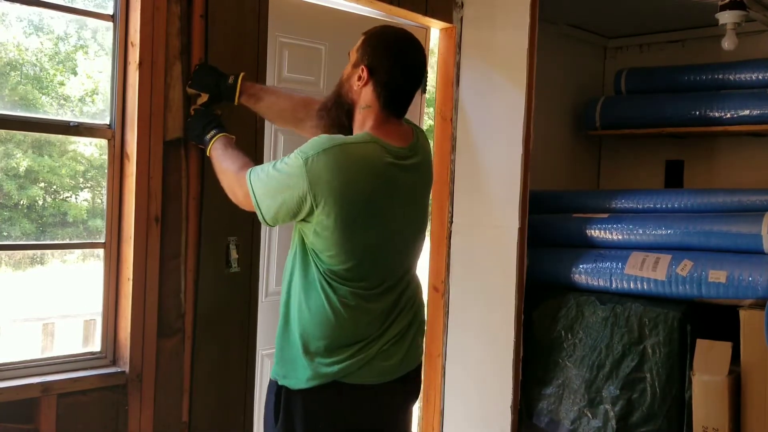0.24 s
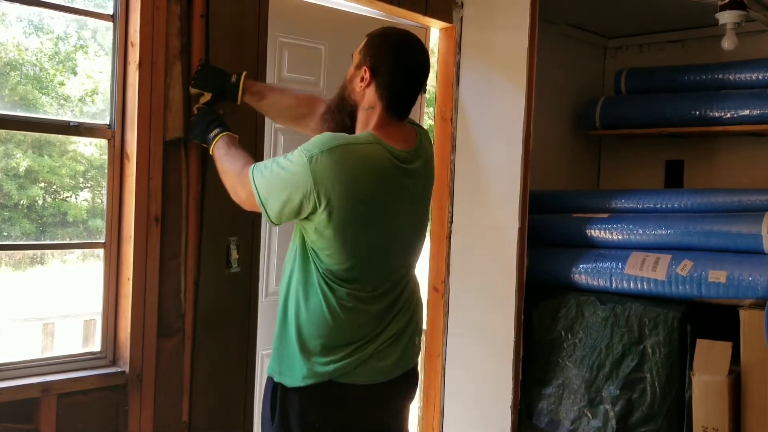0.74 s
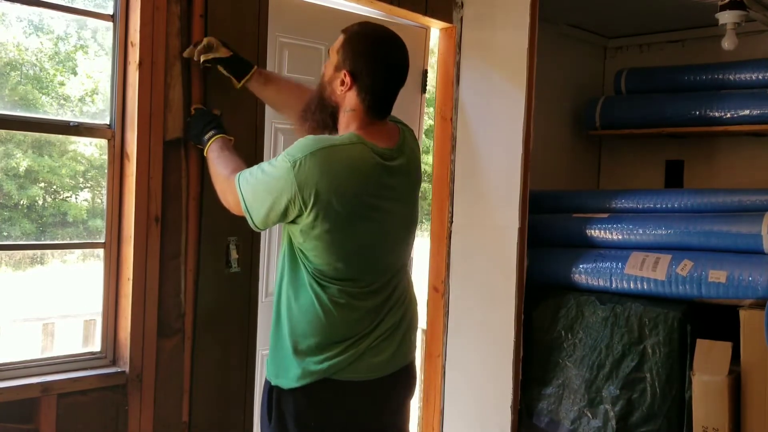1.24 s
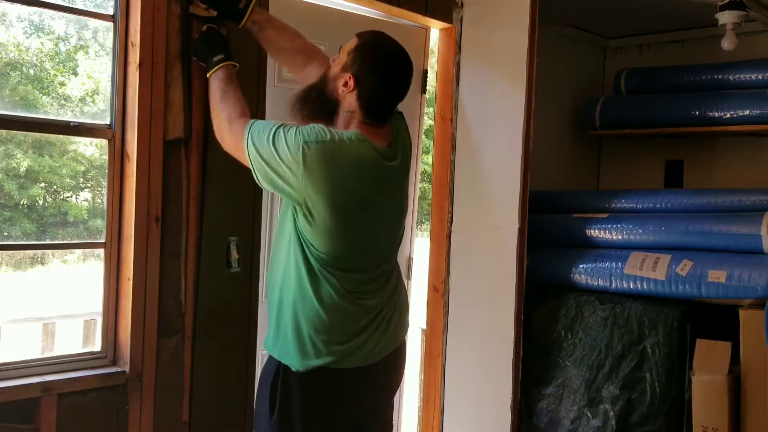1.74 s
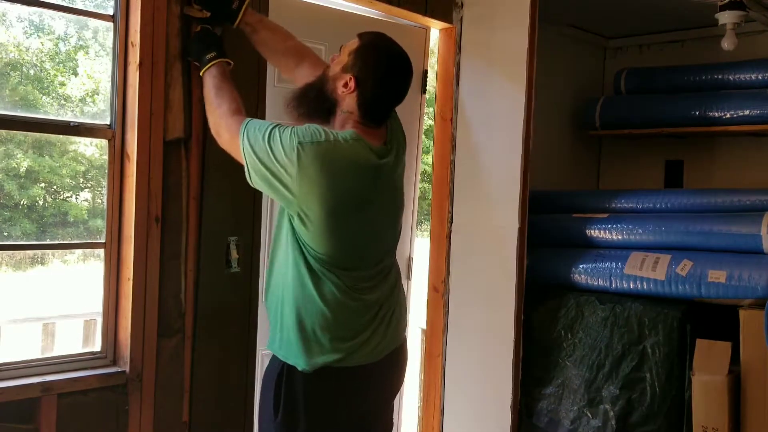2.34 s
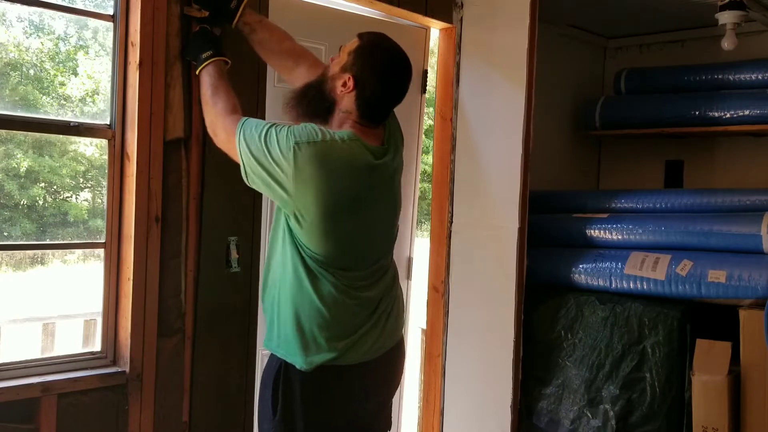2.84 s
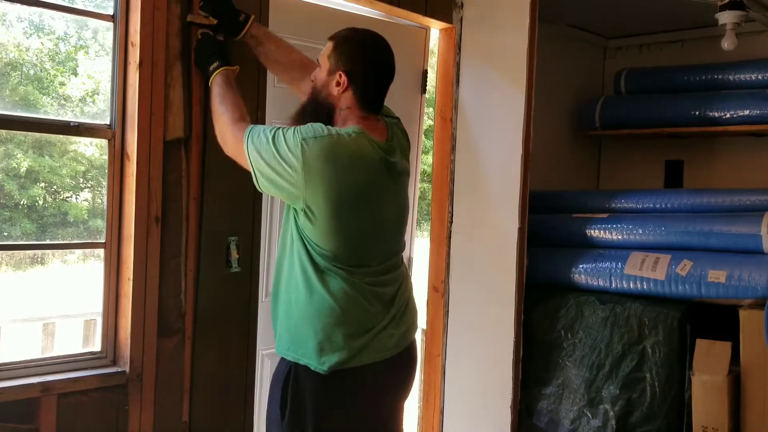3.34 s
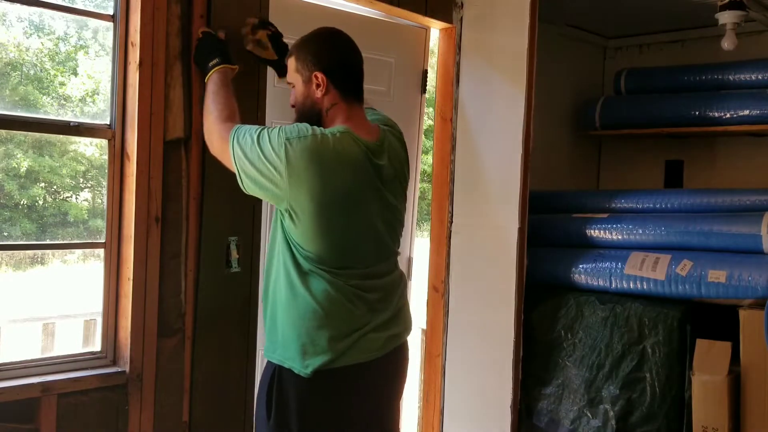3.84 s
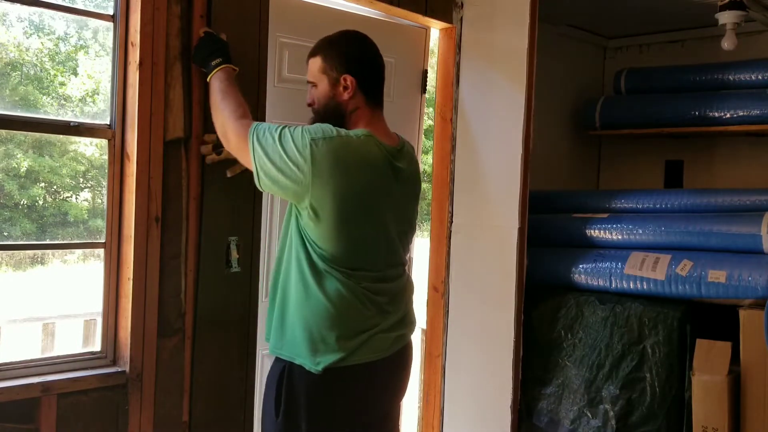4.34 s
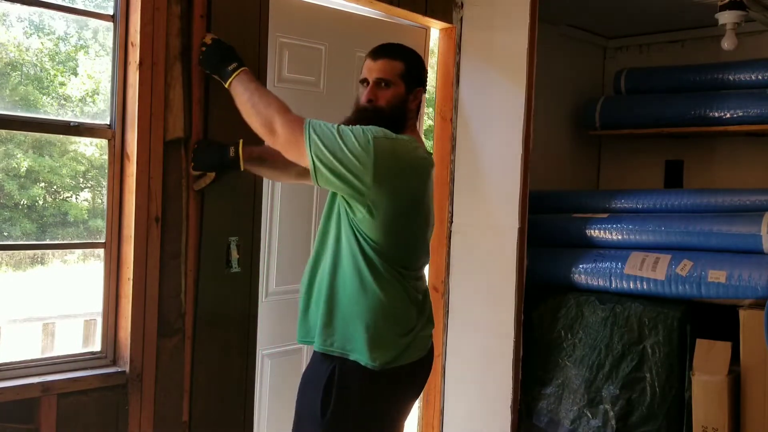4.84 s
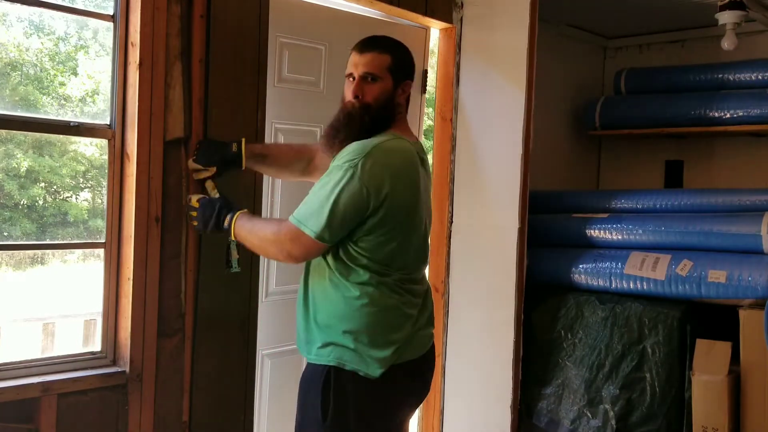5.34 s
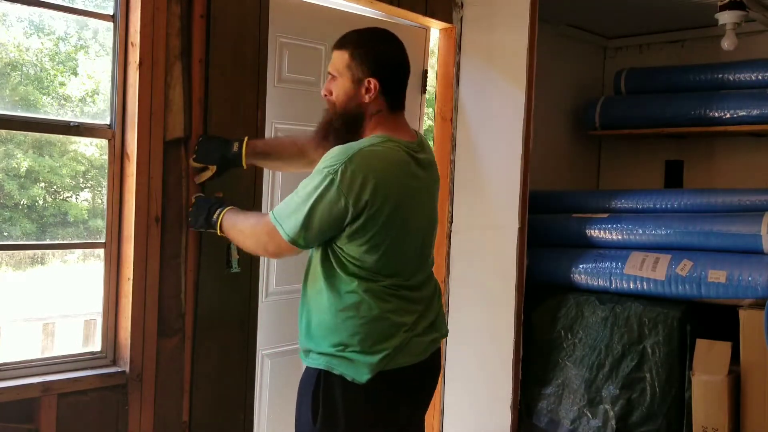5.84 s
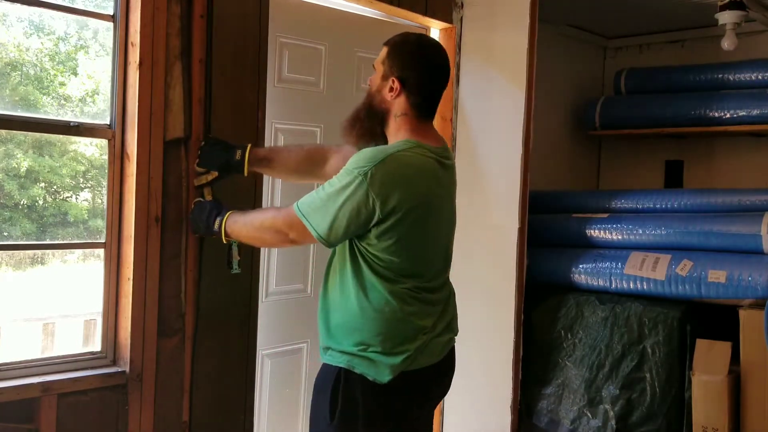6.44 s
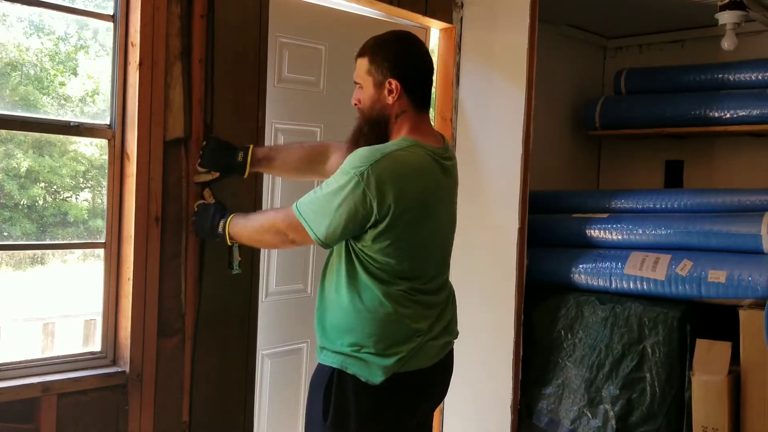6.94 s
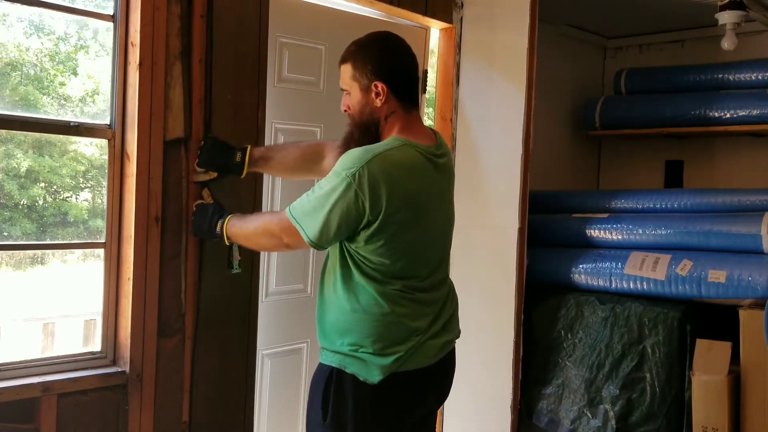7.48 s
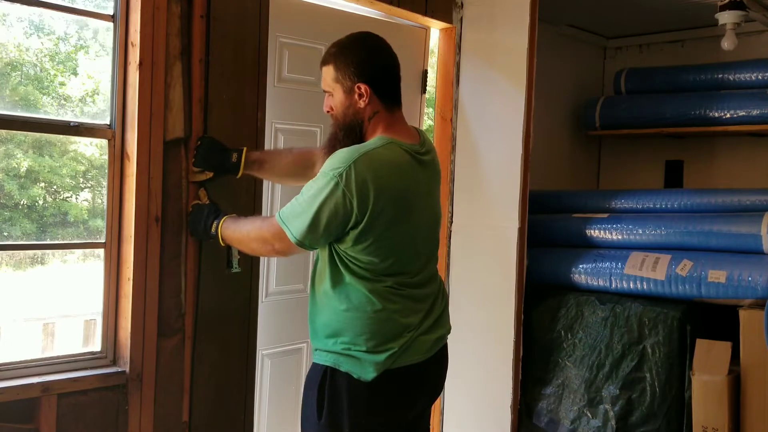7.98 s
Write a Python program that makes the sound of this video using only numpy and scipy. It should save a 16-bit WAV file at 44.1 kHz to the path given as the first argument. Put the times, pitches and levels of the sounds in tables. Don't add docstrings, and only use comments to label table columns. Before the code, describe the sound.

Close, slightly left, a steel pry bar works wooden door trim loose in a small bare room. Light taps and scrapes lead to loud dry snaps, more cracks follow with thuds in the stud wall, then a quieter middle of glove rubs, faint creaks and low bumps. Two heavy splintering bursts come late, then small ticks and scrapes. Short bright room tail over faint outdoor hiss and rumble.

```python
import sys
import numpy as np
from scipy import signal
from scipy.fft import rfft, irfft, next_fast_len
from scipy.io import wavfile
from scipy.ndimage import uniform_filter1d

SR = 44100
rng = np.random.default_rng(int(sys.argv[2]) if len(sys.argv) > 2 else 0)


def unload_wav(signal):
    wavfile.write(
        sys.argv[1],
        SR,
        np.round(np.clip(np.atleast_2d(signal).T, -1, 1) * 32767).astype(np.int16),
    )


def level_to_linear(level):
    exponent = np.asarray(level, float) / 20
    return 10 ** exponent


N = 362061


def evened(x):
    return x / np.sqrt(np.mean(x ** 2) + 1e-20)


def read(points, hz):
    f, value = np.transpose(points)
    return np.interp(np.log(hz + 1), np.log(f + 1), value)


def add(mix, s, sound):
    part = mix[..., round(s * SR):][..., :sound.shape[-1]]
    part += sound[..., :part.shape[-1]]


def resonate(x, hz, width):
    r = np.exp(-np.pi * width / SR)
    if np.ndim(hz) == 0:
        return 2 * signal.lfilter([1 - r], [1, -r * np.exp(2j * np.pi * hz / SR)], x).real
    turn = np.exp(2j * np.pi * np.cumsum(hz) / SR)
    return 2 * (turn * signal.lfilter([1 - r], [1, -r], x / turn)).real


def resonate_twice(x, hz, width):
    return resonate(resonate(x, hz, width), hz, width)


def click(points, split_hz):
    hz = abs(np.fft.fftfreq(2048, 1 / SR))
    low, high = (1 / (1 + (hz / edge) ** 8) for edge in split_hz)
    bands = np.sqrt([low, high * (1 - low), 1 - high])
    bass_cut = hz ** 2 / (hz ** 2 + 90.0 ** 2)
    logs = np.log(level_to_linear(read(points, hz)) * bass_cut * bands + 1e-5)
    minimum_phase = -signal.hilbert(logs).imag
    parts = np.fft.ifft(np.exp(logs + 1j * minimum_phase)).real[:, :1024]
    return parts / np.linalg.norm(parts, axis=1, keepdims=True)


def grit(count, per_s, spread_db):
    there, sign, size = rng.random((count, 3)).T
    return (there < per_s / SR) * np.sign(sign - .5) * level_to_linear(spread_db * np.minimum(-np.log(size + 1e-9), 4))


def air():
    # time_s, level_db
    air_levels = [(0.0, -52), (0.13, -69.5), (0.78, -69.5), (1.05, -65), (1.3, -71.5), (2.58, -81.5),
                  (2.72, -49.5), (2.88, -77), (3.41, -73.5), (3.66, -81.5), (4.78, -62.5), (5.4, -68.5),
                  (6.2, -64.5), (6.35, -50), (6.54, -70), (6.93, -65.5), (7.11, -72), (8.21, -68)]
    # freq_hz, density_db
    hiss = [(120, -31.5), (200, -8), (340, -3), (448, -12), (538, -9), (883, -13), (1500, -13), (6400, -16),
            (7680, -10), (8270, -14.5), (16000, -10)]
    # freq_hz, density_db
    rumble = [(12, -33.5), (20, -7.5), (49, -3.5), (102, 0.5), (175, -11.5), (214, -39.5), (252, -22.5),
              (400, -29), (520, -56.5), (880, -120)]
    frames, hz = N // 256 + 5, np.fft.rfftfreq(1024, 1 / SR)
    s, hiss_db = np.transpose(air_levels)
    rumble_db = -70.5 + 0.94 * (hiss_db + 70)
    out = 0
    for shape, db, same, patchy_db in ((hiss, hiss_db, .45, 1.5), (rumble, rumble_db, .85, 3.0)):
        a, b, c, d, patches = rng.standard_normal((frames, 513, 5)).T
        patches = evened(uniform_filter1d(uniform_filter1d(patches, 10, 0), 12, 1))
        left, other = a + 1j * b, c + 1j * d
        z = np.array([level_to_linear(3.0) * left, same * left + np.sqrt(1 - same ** 2) * other])
        z *= level_to_linear(read(shape, hz)[:, None] + patchy_db * np.clip(patches, -2, 2))
        x = evened(signal.istft(z, nperseg=1024, noverlap=768)[1][:, :N])
        out = out + x * level_to_linear(np.interp(np.arange(N) / SR, s, db) + 1.0)
    return out


def rubs():
    # peak_s, peak_db, swell_s, fade_s, body_rel_db
    strokes = [(0.0, -39.5, 0.01, 0.037, -11.5), (0.361, -44, 0.046, 0.097, -8),
               (1.031, -42.5, 0.067, 0.065, -4.5), (1.206, -42, 0.053, 0.032, -11),
               (3.872, -64.5, 0.12, 0.087, -11), (4.036, -47.5, 0.057, 0.083, -19),
               (4.896, -42, 0.094, 0.088, -4.5), (6.302, -21, 0.071, 0.036, -11),
               (1.676, -31.5, 0.014, 0.07, -10), (4.822, -50, 0.05, 0.06, -18),
               (4.652, -47, 0.025, 0.05, -12), (7.452, -67, 0.008, 0.12, -16),
               (1.185, -52, 0.03, 0.04, -16), (1.02, -49, 0.035, 0.04, -14), (6.278, -30, 0.02, 0.03, -12),
               (4.592, -50, 0.02, 0.05, -18), (2.62, -36, 0.02, 0.09, -12), (0.365, -50, 0.02, 0.06, -30),
               (7.288, -47, 0.019, 0.1, -11), (7.544, -62, 0.46, 0.067, -16)]
    # peak_s, peak_db, swell_s, fade_s, body_rel_db
    gloves = [
        (5.132, -46, 0.05, 0.16, -15),
        (5.235, -58.5, 0.03, 0.14, -6.5),
        (5.76, -54.5, 0.19, 0.021, -8),
    ]
    # start_s, length_s, level_db, body_rel_db
    drags = [
        (3.08, 0.23, -61.5, -5.5),
        (4.396, 0.11, -62.5, -13.5),
        (4.582, 0.33, -55, -12.5),
        (5.815, 0.11, -62.5, -7.5),
        (6.422, 0.092, -48, -14.5),
        (6.927, 0.14, -53.5, -12),
        (7.73, 0.15, -56.5, -14.5),
    ]
    # break_s, level_db, strain_length_s
    strains = [
        (0.772, -30.5, 0.095),
        (1.663, -34.5, 0.032),
        (2.13, -34, 0.028),
        (2.596, -34, 0.062),
        (3.5, -43, 0.24),
        (6.814, -36, 0.19),
        (7.688, -53, 0.064),
    ]
    steel_top_db, glove_top_db = 2, -1.5
    give = 0.26
    out = []
    for rows, top_db in ((strokes, steel_top_db), (gloves, glove_top_db)):
        for s, db, swell, fade, body_db in rows:
            out.append(([s - swell, s, s + fade], [db - 25.0, db, db - 25.0], body_db, top_db))
    for s, length, db, body_db in drags:
        times = [s - 0.051, s, s + length, s + length + 0.1]
        out.append((times, db + np.array([-12, 0, -6, -39]), body_db, steel_top_db))
    for s, db, length in strains:
        times = [s - length, s - give * length, s]
        out.append((times, db + np.array([-48, -29, 0]), -12, steel_top_db))
    return out


def scrapes():
    # freq_hz, density_db
    rub_tone = [(240, -21.5), (450, -7), (620, -6), (920, -12.5), (1300, -6), (1600, -9.5), (2290, -9),
                (3000, -6.5), (4440, 0), (7600, 2.5), (9000, 3), (16000, -10)]
    train = np.zeros((3, N))
    catch = evened(uniform_filter1d(rng.standard_normal(N), 300))
    slips = evened(grit(N, 12000, 2.8) * level_to_linear(1.9 * catch))
    for s, db, body_db, top_db in rubs():
        start = max(s[0], 0)
        t = np.arange(start, s[-1], 1 / SR)
        add(train, start, level_to_linear(np.interp(t, s, db) - 4.0) * level_to_linear([[body_db], [2.2], [top_db]]))
    return signal.oaconvolve(train * slips, click(rub_tone, (2500, 10000)), axes=1)[:, :N].sum(0)


def pushes():
    # start_s, peak_db
    slaps = [(0.041, -42.5), (0.325, -36), (0.442, -46), (0.814, -37.5), (1.202, -42.5), (1.766, -30),
             (2.1, -44), (2.259, -38.5), (2.549, -43), (2.729, -34.5), (3.026, -45), (3.141, -43),
             (3.206, -35.5), (3.489, -40)]
    # start_s, peak_db, panel_pitch_hz, shaking_length_s
    knocks = [(0.372, -41, 280, 0.017), (0.415, -44, 277, 0.02), (0.485, -48, 101, 0.017),
              (0.854, -44, 160, 0.015), (2.211, -44.5, 249, 0.03), (2.688, -44, 200, 0.022),
              (3.165, -50, 276, 0.016), (6.375, -45.5, 100.5, 0.025), (6.95, -44, 177, 0.014),
              (0.727, -37, 125, 0.011), (0.766, -31, 299, 0.02), (1.201, -47, 400, 0.0093),
              (1.014, -35, 432, 0.016), (1.631, -43, 92, 0.031), (1.665, -29.5, 233, 0.012),
              (1.714, -37.5, 326, 0.019), (1.787, -30, 111, 0.023), (2.133, -27.5, 265, 0.016),
              (2.595, -26.5, 235, 0.017), (2.641, -43, 206, 0.049), (3.071, -40.5, 112, 0.014),
              (6.184, -43, 326, 0.023), (6.262, -26.5, 170, 0.031), (6.301, -33, 304, 0.0073),
              (6.818, -26.5, 480, 0.0034), (6.855, -28, 287, 0.0085), (6.863, -35.5, 221, 0.025),
              (7.012, -43, 223.5, 0.015), (7.522, -47, 423, 0.018), (7.855, -45.5, 194, 0.014),
              (7.858, -47.5, 431, 0.015)]
    # start_s, peak_db, panel_pitch_hz, floor_boom_rel_db (under 90 Hz)
    leans = [(4.581, -45, 91.5, 0), (4.635, -42.5, 364, -11), (4.8, -46, 177, -13),
             (4.875, -31.5, 118.4, -17), (5.074, -62.5, 92, 12), (5.241, -53.5, 523, -16),
             (5.383, -54, 93.7, -38), (5.623, -53, 164, -5), (5.767, -41, 104, 0.5),
             (5.819, -47.5, 105, -14), (5.876, -46, 105, -16), (6.442, -44.5, 170, -15.5),
             (7.298, -49.5, 168.3, -0.5), (7.445, -53.5, 192.3, -22), (7.701, -47.5, 169, -5),
             (5.941, -54.5, 219, -18)]
    out = []
    for s, db, hz, length in knocks:
        boom_db = min(-61 - db, -16)
        out.append((s, db, hz, length, boom_db, 2.5))
    for s, db in slaps:
        out.append((s, db, 241, 0.023, -10, 1.5))
    for s, db, hz, boom_db in leans:
        out.append((s, db, hz, 0.028, boom_db, 8))
    return sorted(out)


def thuds():
    # pitch_hz, width_hz, gain_db
    wall_modes = [(108.5, 14, -5.5), (166, 51, 1.5), (200.1, 36, 0.5), (256.4, 57, 1), (319, 27, -7.5),
                  (580, 71, -17.5), (647, 54, -17.5)]
    feeds, t = np.zeros((3, N)), np.arange(9000) / SR
    rows = pushes()
    shakes = rng.standard_normal((len(rows), 9000))
    wall_band = signal.butter(3, [70, 600], "band", fs=SR, output="sos")
    for k, ((s, db, hz, length, boom_db, panel_db), shake) in enumerate(zip(rows, shakes)):
        u = t / max(length, 1e-3)
        push = shake * (1 - np.exp(-1.8 * u)) * np.exp(-u)
        wall = sum(level_to_linear(gain_db) * resonate_twice(push, f, width) for f, width, gain_db in wall_modes)
        panel = level_to_linear(panel_db) * resonate(push, hz, 30)
        ring = signal.sosfilt(wall_band, wall + panel)
        boom = resonate_twice(push, 68, 42)
        thud = ring / abs(ring).max() + level_to_linear(boom_db) * boom / abs(boom).max()
        add(feeds[k % 3], s - .006, level_to_linear(db - 3.5) * thud)
    return feeds


def snaps():
    # start_s, snap_peak_db, body_rel_db (under 2.5 kHz), splinter_top_rel_db (over 11.8 kHz)
    taps = [(0.0726, -47.5, -28, 11), (0.3586, -45, 1, 16), (1.943, -66, -27.5, 16),
            (2.3682, -53, -24.5, 6), (3.0815, -41, 0, 1.5), (3.3725, -57.5, -26.5, 10),
            (4.5381, -58, -2.5, -2.0), (5.0788, -50, -3, -6), (6.1668, -28.5, -13.5, 1),
            (6.7787, -33, -19, 5), (7.0167, -41, -34.5, -1), (7.2852, -42, -16.5, 6),
            (7.4842, -56, -15, 15), (7.6914, -36, -19.5, 14)]
    ticks = [(0.3499, -47, -8, 18), (0.3513, -44, -15, 15), (0.39, -51, -6, 18.5), (0.7635, -27, -16, 8.5),
             (0.8035, -23.5, -16, 3.5), (0.8058, -23, -16.5, -5), (0.8082, -25, -13.5, -3),
             (1.6645, -25, -8.5, 12), (2.5987, -25.5, -6, 4.5), (2.641, -29, -12, 4),
             (3.5026, -41.5, -7, 3.5), (6.1715, -30, -15.5, -2), (6.2059, -34, -13, 10),
             (6.2116, -27, -16, 6), (6.2149, -30.5, -9, 1), (6.7805, -34.5, -9, -1.5),
             (6.7865, -39.5, -18.5, -2), (6.8061, -38.5, -15.5, 3.5), (6.8781, -23, -14, 0),
             (7.0715, -54, -27, 12), (7.2874, -41.5, -13, 3.5), (7.3174, -39, -1, 4), (7.448, -62, -20, 10),
             (7.5036, -62, -18, 10), (7.6978, -38, -18, -2)]
    bites = [(0.7628, -33.5, -10, 11), (1.0146, -50, -10.5, -9), (1.171, -52, -16, -4),
             (1.6633, -32, -9.5, 9), (2.13, -27.5, -6.5, -4), (2.5978, -27.5, -9, 2),
             (3.4944, -42.5, -6.5, 9), (4.3703, -64, -31, 10.5), (4.582, -52, -32, 11.5),
             (4.6413, -52, -15, -2), (4.8162, -56, -31, -7), (5.105, -51, -12, -5), (6.2093, -36.5, -15, 6),
             (2.264, -48.5, -8, 3), (6.2555, -25.5, -10, -1)]
    splits = [(0.7782, -24, -15.5, 0), (1.6722, -28, -20.5, -33), (1.6781, -27, -8.5, 11.5),
              (1.727, -28, -15, 5), (2.1464, -29.5, -2.5, 8.5), (2.6053, -21, -12.5, -12),
              (2.639, -18.5, -9.5, 1.5), (6.1698, -26, -25, -4), (6.2763, -21, -15.5, -3),
              (6.293, -27, -13, 8), (6.3038, -14, -7, 0.5), (6.3194, -21, -7.5, 8), (6.814, -12.5, -9, -2),
              (6.8186, -15, -3.5, 0), (6.8509, -20.5, -14.5, 11.5), (6.8699, -20, -5.5, 2.5)]
    breaks = [
        (0.7977, -18.5, -14.5, 10),
        (0.7999, -11.5, -14.5, 0),
        (0.8016, -11, -15, 10),
        (1.724, -14.5, -7, 3),
        (2.1343, -13, -17, 6),
        (6.8483, -17.5, -17.5, 12),
    ]
    kinds = (breaks, -14.5), (splits, -6.5), (taps, -4.5), (bites, 2.5), (ticks, -21)
    return [(*row, tear_db) for rows, tear_db in kinds for row in rows]


def cracks():
    # freq_hz, density_db
    snap_tone = [(240, -13.5), (400, -7.5), (562, -12), (719, -9.5), (994, -11.5), (2150, -8.5), (2930, -8),
                 (4110, -2), (5690, -1.5), (7630, -1.5), (8630, -4), (11500, 2.5), (15000, 6.5),
                 (16000, -2.5)]
    trains, t = np.zeros((3, 3, N)), np.arange(5000) / SR
    rows = snaps()
    slips = evened(grit(len(rows) * 5000, 7000, 3.0)).reshape(-1, 5000)
    dealt = rng.integers(0, 3, slips.shape)[:, None] == np.arange(3)[:, None]
    bursts = rng.standard_normal(slips.shape) * np.exp(-t / 0.00022)
    bursts /= np.linalg.norm(np.diff(bursts), axis=1, keepdims=True) / np.sqrt(2)
    rise = 1 - np.exp(-t / 0.0011)
    for (s, db, body_db, top_db, tear_db), slip, deal, burst in zip(rows, slips, dealt, bursts):
        length = 0.0087 * level_to_linear(0.42 * (tear_db + 7.0))
        swarm_gain = level_to_linear(tear_db - 9.0 + np.array([[body_db], [0], [0.3 * top_db]]))
        swarm = swarm_gain * slip * np.exp(-t / length) * rise
        snap = level_to_linear([[body_db + 0.5], [1.5], [top_db - 2]]) * burst
        add(trains, s - .0002, level_to_linear(db + 8.0) * deal[:, None] * (swarm + snap))
    return signal.oaconvolve(trains, click(snap_tone, (2500, 11800))[None], axes=2)[..., :N]


def narrow_bands(rows):
    out, t = np.zeros(N), np.arange(9000) / SR
    drift = evened(uniform_filter1d(rng.standard_normal((len(rows), 9000)), 700))
    all_slips = grit(len(rows) * 9000, 2500, 4.5).reshape(-1, 9000)
    for (peak, db, hz, width, swell, fade), slips, wander in zip(rows, all_slips, drift):
        level = level_to_linear(db + np.interp(t, [0, swell, swell + fade], [-18.5, 0, -25], right=-99))
        pitch = hz * (1 + 0.02 * wander)
        add(out, peak - swell, level * evened(resonate_twice(slips, pitch, width)))
    return out


def struck(rows):
    rise_s = 0.0037
    return narrow_bands([(*row[:4], rise_s, row[4]) for row in rows])


def pings():
    # start_s, level_db, pitch_hz, width_hz, fade_s
    spots = [(0.352, -46, 15000, 1200, 0.08), (0.8, -30, 14800, 1400, 0.012), (1.02, -49, 8500, 1500, 0.03),
             (2.134, -33, 1500, 500, 0.02), (2.19, -50, 1800, 1500, 0.08), (2.6, -33, 430, 200, 0.04),
             (4.655, -57, 600, 200, 0.03), (4.91, -56, 1700, 800, 0.03), (5.079, -61, 6300, 800, 0.008),
             (5.107, -56, 7600, 500, 0.006), (5.13, -55, 7500, 500, 0.006), (1.175, -54, 230, 120, 0.04),
             (5.752, -49, 100, 80, 0.05), (5.815, -52, 200, 120, 0.04), (6.815, -31, 2000, 700, 0.012),
             (6.822, -31.5, 750, 150, 0.02), (6.815, -32, 120, 70, 0.05), (6.872, -35, 700, 200, 0.025),
             (7.315, -59, 900, 500, 0.03), (7.502, -63, 14800, 800, 0.03), (7.693, -46, 11500, 2500, 0.03),
             (6.816, -29, 400, 150, 0.035), (0.8, -30, 2100, 500, 0.016), (5.86, -58, 300, 200, 0.08),
             (7.695, -57, 2200, 400, 0.05), (4.76, -58, 12000, 5000, 0.08)]
    return struck(spots)


def rings():
    # start_s, level_db, pitch_hz, width_hz, fade_s
    struck_spots = [(0.77, -37.5, 8200, 1400, 0.045), (0.8, -27, 2600, 600, 0.008),
                    (0.803, -27, 5130, 1000, 0.026), (6.17, -34, 7400, 1200, 0.015),
                    (6.82, -32, 720, 150, 0.04), (6.818, -37.5, 397, 200, 0.06),
                    (6.82, -29, 4030, 900, 0.04), (6.855, -31, 7700, 1800, 0.083),
                    (7.288, -53, 7600, 1500, 0.06), (7.29, -59, 2020, 1300, 0.028),
                    (7.695, -57, 1960, 1200, 0.095), (7.7, -56.5, 4330, 600, 0.1),
                    (7.694, -47.5, 7660, 1600, 0.073)]
    return struck(struck_spots)


def bar():
    # pitch_hz, width_hz, gain_db
    steel_bands = [(2380, 230, -33), (4000, 1400, 2), (7580, 650, 2)]
    # start_s, level_db, t60_s
    buzzes = [
        (1.723, -35.5, 0.23),
        (2.139, -40.5, 0.27),
        (6.868, -57, 0.14),
        (7.691, -68.5, 0.094),
    ]
    t, chatter = np.arange(N) / SR, rng.standard_normal(N)
    level = sum(level_to_linear(db - 60 * abs(t - s) / t60) * (t > s) for s, db, t60 in buzzes)
    buzz = sum(level_to_linear(db) * resonate_twice(chatter, hz, width) for hz, width, db in steel_bands)
    return level * evened(buzz)


def creaks():
    # peak_s, level_db, pitch_hz, width_hz, swell_s
    groans = [(4.66, -62, 2450, 700, 0.051), (4.644, -59.5, 520, 248, 0.092),
              (4.891, -54.5, 1367, 90, 0.09), (4.903, -56, 2290, 220, 0.094),
              (4.903, -49.5, 4400, 800, 0.084), (5.101, -62.5, 1190, 300, 0.03),
              (5.261, -72, 550, 180, 0.057), (5.69, -64, 592.6, 380, 0.058), (5.71, -73, 2100, 200, 0.1),
              (6.4, -60, 1350, 350, 0.054), (5.829, -62.5, 327, 200, 0.052), (5.902, -58, 500, 400, 0.07),
              (5.898, -72.5, 1210, 600, 0.086), (6.285, -34.5, 4940, 650, 0.02),
              (6.29, -38.5, 1230, 200, 0.026), (6.302, -39, 7600, 900, 0.048),
              (7.322, -56, 2200, 900, 0.017), (3.876, -76, 2368, 250, 0.065),
              (4.05, -70, 2500, 231.5, 0.042)]
    fade_s = 0.053
    return narrow_bands([(*row, fade_s) for row in groans])


def room(feeds, fade):
    # freq_hz, t60_s
    decay = [(100, 0.4), (260, 0.16), (700, 0.28), (1840, 0.25), (4850, 0.28), (12800, 0.28)]
    taps = np.zeros((6, SR // 2))
    at = np.arange(120, SR // 2 - 12, 12)
    at = at + rng.integers(0, 12, (6, len(at)))
    np.put_along_axis(taps, at, rng.choice([-1., 1.], at.shape), 1)
    taps[3:] += 0.06 * np.roll(taps[:3], 1, axis=1)
    hz, t, z = signal.stft(taps, SR, nperseg=256)
    near = np.clip(1 - hz / 600, 0, 1)[:, None]
    z[3:] = near * z[:3] + (1 - near) * z[3:]
    tails = signal.istft(z * level_to_linear(-60 * t / read(decay, hz)[:, None]), SR, nperseg=256)[1]
    tails /= np.linalg.norm(tails, axis=1, keepdims=True)
    early = fade > 0
    wet = [signal.oaconvolve(np.tile(feeds * part, (2, 1)), tails, axes=1)[:, :N] for part in (early, ~early)]
    return (wet[0] * fade + wet[1]).reshape(2, 3, N).sum(1) * level_to_linear([[1.2], [-1.2]])


def direct(x):
    # freq_hz, left_minus_right_db
    left_lead = [(300, 3.3), (2000, 4), (8000, 5), (14000, 15)]
    # freq_hz, lead_radians
    left_phase = [(300, 0.13), (1200, 0.6), (3100, 1.6), (5800, 2.3), (7000, 0.2), (14000, 0),
                  (16000, -0.8)]
    size = next_fast_len(N)
    hz = np.fft.rfftfreq(size, 1 / SR)
    lead = read(left_lead, hz) / 2
    ears = np.array([level_to_linear(lead), level_to_linear(-lead) * np.exp(-1j * read(left_phase, hz))])
    return irfft(rfft(x, size) * ears, size)[:, :N]


def scene():
    t = np.arange(N) / SR
    cut_s, resume_s = 3.255, 3.273
    fade = np.clip((cut_s - t) / 0.0028, 0, 1)
    kept = fade + (t > resume_s + .08)
    snap, thud, rub = cracks() * kept, thuds() * kept, (scrapes() + bar()) * kept
    creak = (creaks() + rings()) * kept
    beamed = level_to_linear([[0.0], [0.5], [-4.0]])
    feeds = (beamed * snap).sum(1) + level_to_linear(-9.5) * thud
    feeds[0] += rub + level_to_linear(-7.0) * creak
    gap = np.maximum(fade + (t > resume_s), level_to_linear(-12))
    gap *= level_to_linear(-4 * ((t > 1.578) & (t < 1.64)))
    around = room(feeds, fade) + gap * air()
    near = snap.sum((0, 1)) + thud.sum(0) + rub + level_to_linear(2.0) * creak + pings()
    return direct(near) + around


def roll_off(x):
    return signal.sosfilt(signal.butter(12, 16810, fs=SR, output="sos"), x)


def record(dry):
    edge_hz, spill = 15800, level_to_linear(-40)
    corners_hz = [0, edge_hz, edge_hz + 150, edge_hz + 850, edge_hz + 950, SR / 2]
    edge = signal.firwin2(801, corners_hz, [1, 1, spill, spill, 0, 0], fs=SR)
    rounded = 0.97 * np.tanh(dry / 0.93)
    return roll_off(signal.oaconvolve(rounded, edge[None], "same"))


dry = scene()
out = record(dry)
unload_wav(out)
```